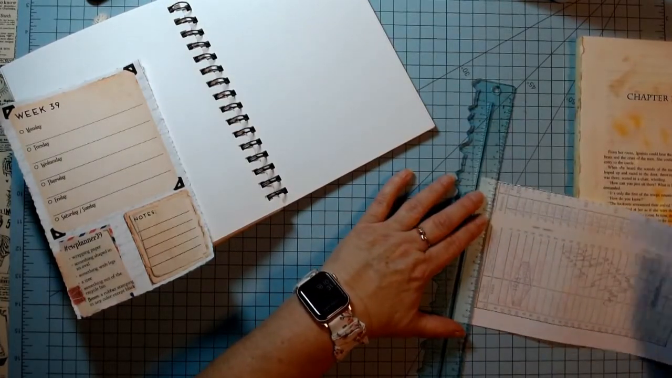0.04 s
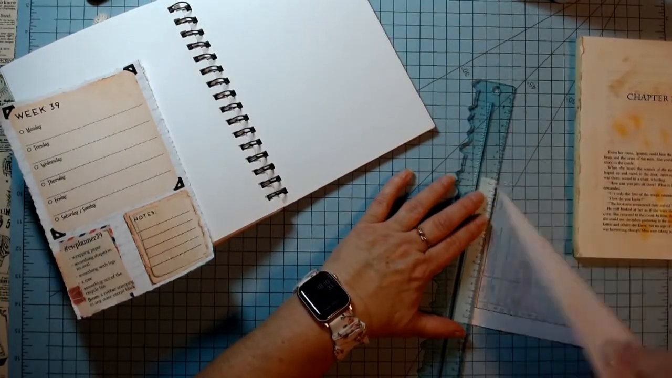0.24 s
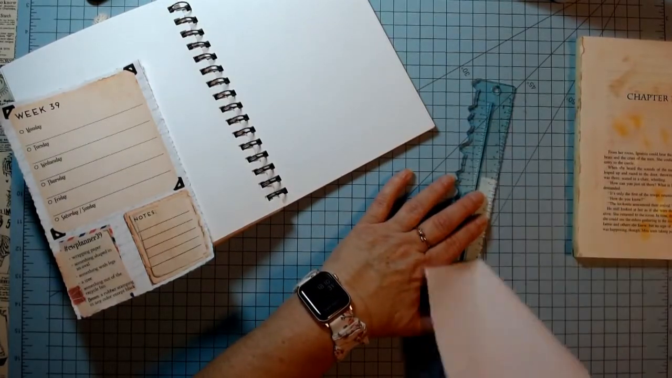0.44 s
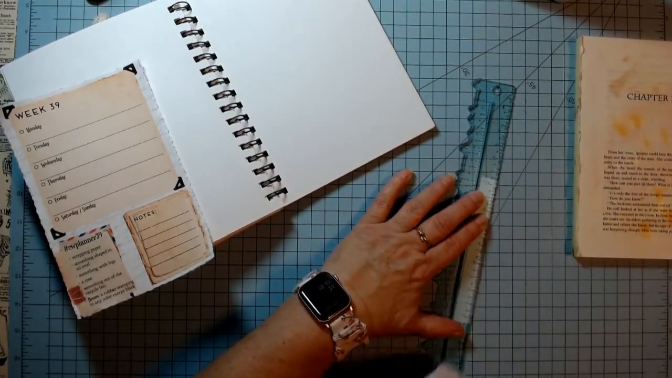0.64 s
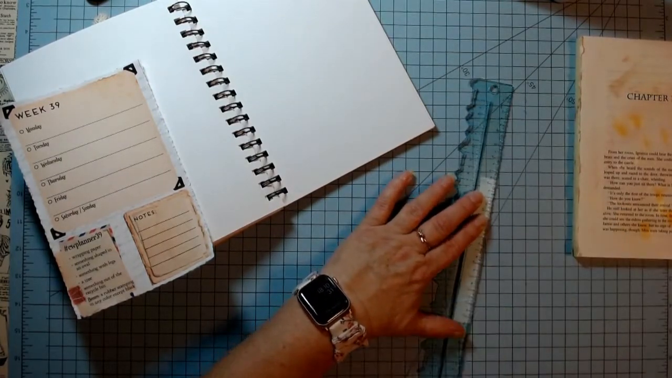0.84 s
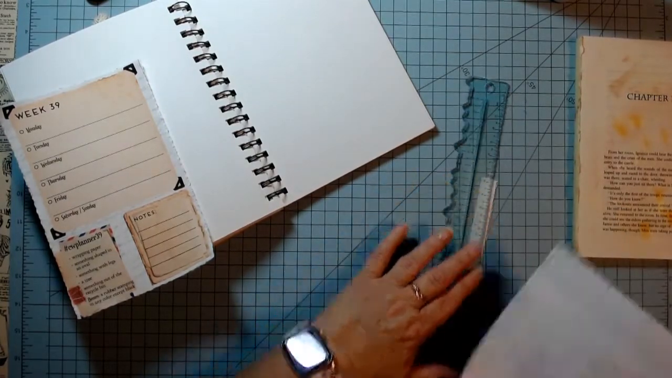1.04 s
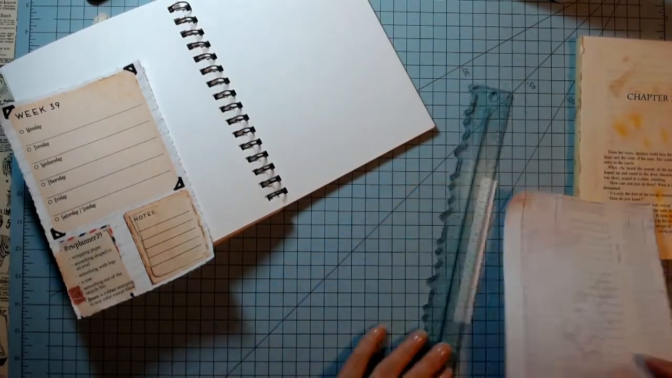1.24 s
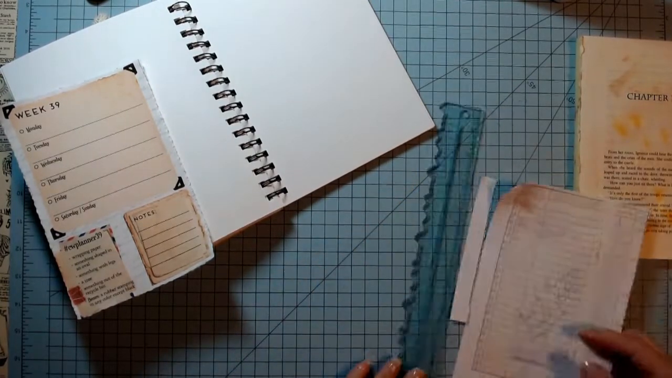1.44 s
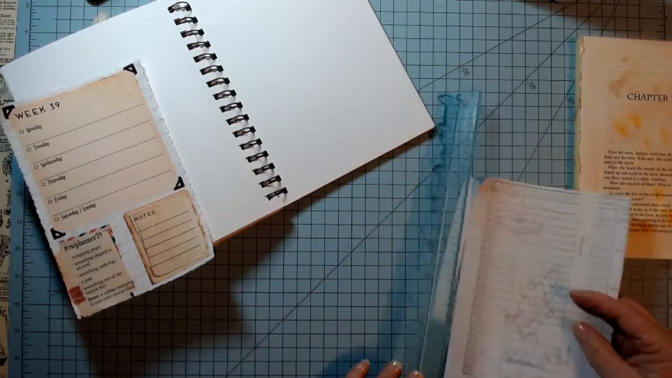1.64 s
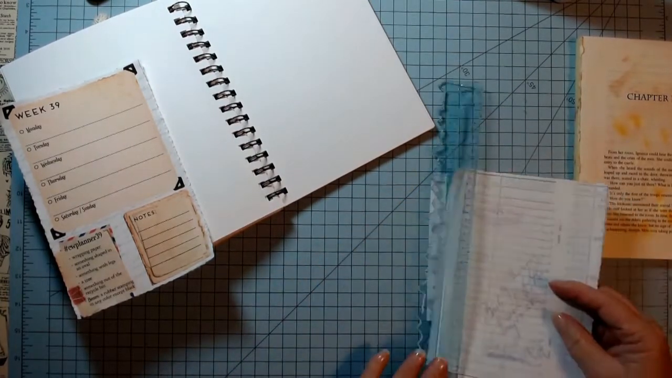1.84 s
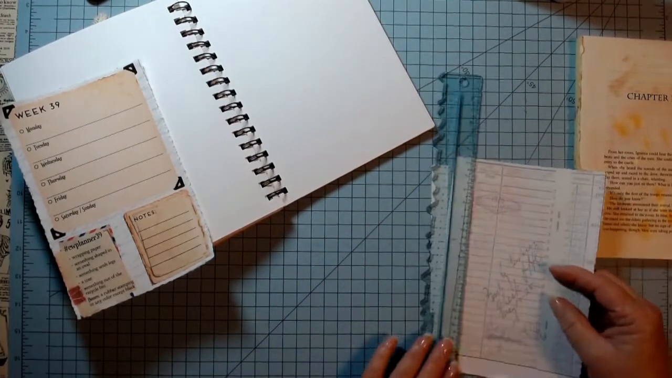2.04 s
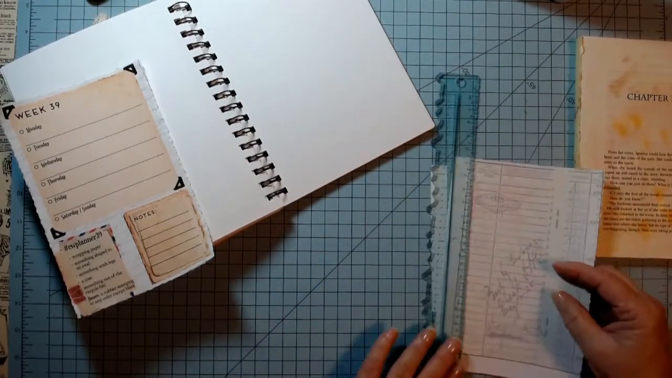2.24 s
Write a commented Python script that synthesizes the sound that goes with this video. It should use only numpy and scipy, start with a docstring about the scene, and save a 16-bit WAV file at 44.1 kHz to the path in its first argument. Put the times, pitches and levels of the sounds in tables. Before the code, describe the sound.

A sheet of paper tears crisply against a ruler edge, rustles, then the ruler clacks down

```python
"""A sheet of paper is ripped along a plastic ruler on a craft table, close under a two-port microphone.
The rip, slides and squashed paper are dense random snaps in bands that follow drawn levels.
Snapping and buckling paper and the ruler, set down with a click, ring modes; rubs are narrow noise.
A small room answers them with sparse random taps, over soft air, a low hum and a faint throbbing insect."""
import sys
import numpy as np
from scipy import signal
from scipy.fft import rfft, irfft
from scipy.io import wavfile

SR = 44100
rng = np.random.default_rng(int(sys.argv[2]) if len(sys.argv) > 2 else 0)


def amplitude_ratio(level_db):
    """Convert a level in decibels to the matching linear amplitude (field) ratio."""
    exponent = np.asarray(level_db, float) / 20
    return 10 ** exponent


def master_out(mix):
    """Clip the mix to full scale and print it as 16-bit PCM to the path in sys.argv[1]."""
    frames = np.transpose(np.atleast_2d(mix))
    ceiling = np.clip(frames, -1, 1)
    pcm = np.round(ceiling * 32767).astype(np.int16)
    wavfile.write(sys.argv[1], SR, pcm)


N = 101430  # samples

# Relative colour of tearing and squashed paper. Each row: frequency in Hz, density in dB per Hz.
RIP_COLOUR = [(30, -17.5), (60, -17.5), (90, -27), (110, -4.5), (130, -1.5), (155, -11), (220, 0),
              (270, -2), (312, 6.5), (370, -2), (550, -6), (1000, -4), (2700, -2.5), (3900, -4), (5000, -5),
              (7200, -16.5), (8200, -26.5), (15500, -38), (15900, -58.5), (16800, -91)]
# Crossovers between the four bands of scuffed paper, in Hz.
SLIDE_EDGES_HZ = [530, 1600, 3800]
SCUFFS_PER_S, SCUFF_SPREAD_DB = 7000, 6


def evened(x):
    """Scales a sound to rms 1, over all its channels together."""
    return x / np.sqrt(np.mean(x ** 2) + 1e-20)


def read(points, hz):
    """Reads a table of values over log frequency."""
    f, value = np.transpose(points)
    return np.interp(np.log(hz + 1), np.log(f + 1), value)


def resonate(x, hz, width):
    """One resonance of gain 1: shift its pitch to zero, smooth with one pole, shift back."""
    turn = np.exp(2j * np.pi * np.cumsum(hz * np.ones(N)) / SR)
    r = np.exp(-np.pi * width / SR)
    return 2 * (turn * signal.lfilter([1 - r], [1, -r], x / turn)).real


def resonate_twice(x, hz, width):
    """Two equal resonances in series, for steeper skirts."""
    return resonate(resonate(x, hz, width), hz, width)


def crackle(curves, edges_hz, colour, per_s, spread_db):
    """Dense tiny snaps of uneven size take the paper's colour; each band follows its own level."""
    sizes = amplitude_ratio(spread_db * np.minimum(rng.exponential(1, N), 4))
    snaps = rng.choice([-1., 1.], N) * sizes * (rng.random(N) < per_s / SR)
    hz, t = np.fft.rfftfreq(N, 1 / SR), np.arange(N) / SR
    lowpasses = [1 / (1 + (hz / edge) ** 8) for edge in edges_hz]
    splits = np.diff([0 * hz] + lowpasses + [0 * hz + 1], axis=0)
    coloured = rfft(snaps) * amplitude_ratio(read(colour, hz))
    bands = [evened(v) for v in irfft(coloured * splits, N)]
    out = np.zeros(N)
    for rows in curves:
        s, db, *rel_db = np.transpose(rows)
        sounding = (t >= s[0]) * (t < s[-1])
        # the third band carries the level itself, the others stand relative to it
        for band, offset in zip(bands, np.insert(rel_db, 2, 0, axis=0)):
            out += amplitude_ratio(np.interp(t, s, db + offset)) * sounding * band
    return out


def blows(rows, modes, crack_db):
    """Each blow rings the modes nearest its favoured pitch most, with a short crack of noise on top."""
    rise_s, crack_t60_s, crack_top_hz = 0.0001, 0.0027, 6000
    focus_db = 10.5  # modes weaken by this times the squared octaves from the favoured pitch
    out, t = np.zeros(N + SR), np.arange(8000) / SR
    hz, db, t60 = np.transpose(modes)[:, :, None]
    crack_lowpass = signal.butter(2, crack_top_hz, fs=SR)
    for s, peak_db, favoured_hz in rows:
        # each blow varies every mode's level, pitch and phase
        vary_db, vary_hz, vary_phase = rng.uniform(-1, 1, (3, len(modes), 1))
        focus = focus_db * np.log2(hz / favoured_hz) ** 2
        level = amplitude_ratio(db - focus + 2 * vary_db - 60 * t / t60)
        phase = 2 * np.pi * hz * (1 + 0.02 * vary_hz) * t + np.pi / 2 * vary_phase
        ring = (level * np.sin(phase)).sum(0) * np.minimum(t / rise_s, 1)
        noise = signal.lfilter(*crack_lowpass, rng.standard_normal(len(t)))
        crack = amplitude_ratio(crack_db - 60 * t / crack_t60_s) * noise
        out[round(s * SR):][:len(t)] += amplitude_ratio(peak_db) * (ring / abs(ring).max() + crack)
    return out[:N]


def room_air():
    """Steady coloured noise, partly alike in the two ports."""
    # Relative colour of the air. Each row: frequency in Hz, density in dB per Hz.
    air_colour = [(8.8, -19.5), (15, -1), (97, -5), (417, -18), (793, -26.5), (1420, -30), (2080, -30.5),
                  (3610, -39), (7720, -46), (8930, -64.5), (16000, -67.5)]
    # Left-right likeness. Each row: frequency in Hz, likeness from 0 to 1.
    air_same = [(30, 0.71), (500, 0.83), (2000, 0.64), (8000, .2)]
    air_db = -69.5
    hz = np.fft.rfftfreq(N, 1 / SR)
    a, b = rfft(rng.standard_normal((2, N)))
    same = np.clip(read(air_same, hz), 0, 1)
    pair = np.array([a, same * a + np.sqrt(1 - same ** 2) * b])
    return amplitude_ratio(air_db) * evened(irfft(pair * amplitude_ratio(read(air_colour, hz)), N))


def low_hum():
    """A steady sine plus narrow noise at the same pitch, which wavers more on the left."""
    hum_hz, width_hz, steady, hum_db = 41.5, 12, 0.7, -59
    left_waver = 1.6  # times the right
    tone = np.sqrt(2) * np.sin(2 * np.pi * hum_hz * np.arange(N) / SR)
    waver = evened(resonate_twice(rng.standard_normal(N), hum_hz, width_hz))
    waver = waver * np.array([[left_waver], [1]])
    return amplitude_ratio(hum_db) * evened(steady * tone + (1 - steady) * waver)


def insect():
    """Narrow high noise, separate in each port, swells and fades in regular throbs."""
    pitch_hz, width_hz, throbs_per_s, first_peak_s, insect_db = 7750, 700, 29.5, 0.01, -89.5
    t = np.arange(N) / SR
    throb = np.cos(np.pi * throbs_per_s * (t - first_peak_s)) ** 4
    chirp = [resonate_twice(v, pitch_hz, width_hz) for v in rng.standard_normal((2, N))]
    return amplitude_ratio(insect_db) * evened(throb * np.array(chirp))


def room(x):
    """Three tails of sparse random taps take turns; each band has its own level and decay."""
    # Decay of the room. Each row: frequency in Hz, t60 in seconds.
    room_t60 = [(150, 0.32), (600, 0.055), (2000, 0.16), (6000, 0.12), (12000, 0.022)]
    # Colour of the tail. Each row: frequency in Hz, level in dB.
    tail_db = [(80, -14.5), (300, -7), (1000, -2), (4000, -2), (12000, 15)]
    turn_s = 0.04  # for each turn between tails, so no fixed pattern of echoes stands out
    taps = np.zeros((3, 2, SR // 2))
    slots = np.arange(40, SR // 2 - 20, 20)  # one tap somewhere in each 20 samples
    at = slots + rng.integers(0, 20, (3, 2, len(slots)))
    np.put_along_axis(taps, at, rng.choice([-1., 1.], at.shape), 2)
    hz, t, z = signal.stft(taps, SR, nperseg=256)
    fade = amplitude_ratio(-60 * t / read(room_t60, hz)[:, None])
    fade = fade / np.linalg.norm(fade, axis=1)[:, None] * amplitude_ratio(read(tail_db, hz))[:, None]
    tail = signal.istft(z * fade, SR, nperseg=256)[1] * np.sqrt(20 / 128)
    # three cosines a third of a half-turn apart keep the summed power constant
    angle = np.arange(N) / SR / turn_s / 3 + np.arange(3)[:, None] / 3
    turns = np.sqrt(2 / 3) * np.cos(np.pi * angle)
    return signal.fftconvolve((turns * x)[:, None], tail, axes=2)[..., :N].sum(0)


def ports(x):
    """The direct sound reaches the right port first, with a colour of its own."""
    # Right port against the left. Each row: frequency in Hz, level in dB.
    right_db = [(60, -4.5), (300, -2.5), (1200, -3), (3000, 0.34), (6000, 0.5), (12000, -2.9)]
    left_lag = 4  # samples
    left = np.pad(x, (left_lag, 0))[:N]
    right = irfft(rfft(x) * amplitude_ratio(read(right_db, np.fft.rfftfreq(N, 1 / SR))), N)
    return np.array([left, right])


def paper_slides():
    """Paper lifted and slid: scuffs of very uneven size in four bands."""
    # One list per stretch of sliding, a new one at sharp onsets. Each row: time in seconds,
    # level in dB near 2.5 kHz, then bass, middle and treble in dB re that level.
    slide_curves = [
        [(0.0, -91, 23, 3, 16), (0.032, -67, -5, -6, -7.5), (0.108, -94.5, 11, 6, 7),
         (0.122, -72, 17, 18, -9.5)],
        [(0.7, -76, 12, 16, -5), (0.704, -83, 0, 29, -9), (0.716, -57, -8, 28, -17)],
        [(1.788, -83.5, 9, 10.5, 10.5), (1.81, -65.5, -19.5, -7, -3.5), (1.846, -73.5, -10, 1.5, -0.5),
         (1.898, -87.5, -7, 4, 9)],
        [(1.907, -73.5, -10.5, -9.5, 18), (1.911, -71.5, -11, -18, 7.5), (1.939, -73, -7.5, -19, -1),
         (1.985, -93, 23, 4, 8)],
        [(2.236, -95.5, 3.5, -1.5, 5), (2.244, -79.5, -11, 3.5, 6), (2.288, -77.5, -2, -11, -8),
         (2.3, -84.5, 11, -1, 1)],
        [(0.125, -62, 16, 21.5, -7), (0.137, -39.5, 4.5, -4, 0), (0.163, -47.5, 2.5, -8, -15),
         (0.191, -63.5, 19.5, 10.5, -13), (0.203, -63, 15.5, 21, -5)],
        [(1.11, -74, -22, -11, 0), (1.132, -61.5, -10, -2, 2.5), (1.152, -58.5, -3.5, 2, -2.5),
         (1.214, -58, -1.5, -7, -7), (1.232, -61, -6, -15, -6), (1.26, -69, 4, 3, -13), (1.27, -64.5, 5, 5, 7)],
        [(1.272, -70, -17, 12, 0), (1.282, -51.5, -8, 0, -10.5), (1.384, -75.5, 14, 5.5, -3),
         (1.426, -78, 0, -0.5, -6.5), (1.462, -93, 24, 4.5, -12), (1.48, -81, -7, 10, 0),
         (1.49, -95.5, 16, 4, -13)],
        [(1.49, -93.5, 19.5, 21, 3), (1.56, -60.5, -10.5, -8, -7.5), (1.606, -60.5, -18, -22, -6),
         (1.624, -67.5, -9, -9.5, -5.5), (1.652, -72, -8.5, -4, -8), (1.702, -93.5, 22, 16, -4),
         (1.786, -97, 19, 13, -0.5)],
        [(0.717, -53.5, -12, 15, -15), (0.729, -46, -22, 9.5, -11), (0.739, -57.5, -6, 14, -3),
         (0.783, -62, 4, 16, 7.5), (0.819, -54.5, -10, 13.5, -3.5), (0.855, -67.5, 8, 1, -1),
         (0.875, -58, 9, 11.5, -0.5), (0.925, -65, 2, 2, 1.5), (0.947, -57, -14, -3, -3.5),
         (1.013, -57.5, -15, 0.5, 1), (1.023, -53.5, -14, 0.5, 1.5), (1.045, -72.5, -2, 7, 6),
         (1.11, -69, -10, -3, 6)],
    ]
    # Relative colour of sliding paper. Each row: frequency in Hz, density in dB per Hz.
    slide_colour = [(60, -23.5), (120, -1.5), (270, 3.5), (450, 2), (700, 6.5), (1000, 6.5), (2600, 5),
                    (5000, -2.5), (7200, -18), (8200, -26.5), (15500, -37), (15900, -51.5), (16800, -89.5)]
    return crackle(slide_curves, SLIDE_EDGES_HZ, slide_colour, SCUFFS_PER_S, SCUFF_SPREAD_DB)


def paper_rubs():
    """Rubbed paper briefly sings, or thumps low: noise in one narrow resonance, swelling and fading."""
    # Each row: start in seconds, length in seconds, starting pitch in Hz,
    # width of each resonance in Hz, level in dB at the height of the swell.
    rub_rows = [(0.765, 0.078, 820, 250, -46), (1.015, 0.017, 2630, 400, -52.5),
                (1.124, 0.083, 1017, 110, -53.5), (1.208, 0.15, 908, 64, -61.5),
                (1.274, 0.03, 1770, 650, -44), (1.379, 0.11, 2456, 18, -79), (1.589, 0.036, 2140, 60, -60),
                (1.545, 0.076, 2680, 110, -64), (1.55, 0.1, 1286, 370, -65),
                (1.683, 0.064, 700, 200.3, -70), (1.902, 0.038, 2700, 470, -64),
                (0.863, 0.031, 715, 400, -50.5), (1.439, 0.071, 2160, 44, -77.5),
                (0.904, 0.067, 130, 45, -62), (1.13, .06, 120, 60, -64), (1.169, 0.091, 216, 34, -61.5)]
    rise = 0.59  # below 1: rises faster than it fades
    sag = 0.01  # share by which the pitch falls over one rub
    noise, t, out = rng.standard_normal(N), np.arange(N) / SR, np.zeros(N)
    for s, length, start_hz, width, db in rub_rows:
        done = np.clip((t - s) / length, 0, 1)
        swell = np.sin(np.pi * done ** rise)
        out += amplitude_ratio(db) * swell * evened(resonate_twice(noise, start_hz * (1 - sag * done), width))
    return out


def sheet_snaps_and_pops():
    """The sheet snaps as it rips and pops as it buckles: each blow rings its modes, the bass cut away."""
    # Each row: time in seconds, peak of the ring in dB before the bass cut, favoured pitch in Hz.
    sheet_blows = [(0.13, -31.5, 480), (0.135, -23, 1540), (0.148, -26.5, 1000), (0.176, -33, 500),
                   (0.211, -21.5, 2700), (0.216, -20, 700), (0.2365, -14, 2800), (0.246, -18, 2000),
                   (0.2585, -14.5, 1810), (0.267, -16.5, 1900), (0.309, -17, 2900), (0.329, -15, 2400),
                   (0.436, -21, 1200), (0.478, -18, 1000), (0.558, -18, 1000), (0.708, -36.5, 800),
                   (0.7165, -18.5, 800), (0.717, -33.5, 2850), (0.721, -28, 1150), (0.725, -26, 700),
                   (0.728, -23, 1350), (0.733, -32, 2700), (0.748, -26.5, 650), (0.754, -25, 820),
                   (0.778, -34, 800), (0.787, -30, 1110), (0.8, -36, 1100), (0.816, -34.5, 830),
                   (0.835, -39.5, 800), (0.869, -32.5, 700), (0.884, -39, 600), (1.021, -52, 2700),
                   (1.279, -48, 1800)]
    # Modes of the sheet. Each row: pitch in Hz, level in dB, t60 in seconds.
    sheet_modes = [(478, -7, .05), (615, -3, 0.03), (700, 3, 0.02), (830, -2.5, 0.079), (910, -6.5, 0.02),
                   (1150, -1.5, 0.03), (1400, -6.5, 0.0074), (1980, -4.5, 0.017), (2228, -5.5, 0.023),
                   (2850, -5.5, .012)]
    crack_db, lowest_hz = -23, 380  # crack re the ring's peak
    bass_cut = signal.butter(2, lowest_hz, "high", fs=SR, output="sos")
    return signal.sosfilt(bass_cut, blows(sheet_blows, sheet_modes, crack_db))


def paper_squash():
    """Paper pressed flat under the ruler: scuffs in the colour of the rip."""
    # Each row: time in seconds, level in dB near 2.5 kHz before the trim,
    # then bass, middle and treble in dB re that level.
    squash_curve = [(1.99, -64.5, 13, 0, -3), (1.998, -35.5, -2, 6.5, 3.5), (2.008, -28.5, 2, 8.5, -9.5),
                    (2.038, -53.5, 23.5, -13, 5), (2.046, -37, -7, 6, 0), (2.06, -48, -3, 13.5, 4.5),
                    (2.194, -100, 39.5, -2.5, 3), (2.2, -94, 16, 2, -7.5)]
    trim_db = -8
    scuffs = crackle([squash_curve], SLIDE_EDGES_HZ, RIP_COLOUR, SCUFFS_PER_S, SCUFF_SPREAD_DB)
    return amplitude_ratio(trim_db) * scuffs


def ruler_knocks():
    """The ruler lands and rocks: each knock rings the modes of the ruler."""
    # Each row: time in seconds, peak of the ring in dB, favoured pitch in Hz.
    knock_rows = [(1.9995, -17.5, 3000), (2.004, -20.5, 450), (2.0075, -16.5, 2760), (2.015, -26, 1903),
                  (2.021, -26.5, 750), (2.029, -26.5, 220.5), (2.045, -22, 2000), (2.053, -23.5, 1400),
                  (2.064, -36, 298)]
    # Modes of the ruler. Each row: pitch in Hz, level in dB, t60 in seconds.
    ruler_modes = [(122.6, -6, 0.22), (210, 1, 0.12), (333.4, 3, 0.038), (730, 1.5, 0.0264),
                   (1400, -1, 0.024), (2017, 5, 0.014), (2713, 5.5, 0.015), (3000, -2.5, .015),
                   (3480, -7, 0.018)]
    return blows(knock_rows, ruler_modes, -27.5)  # crack in dB re the ring's peak


def rip():
    """Paper fibres snap thousands of times a second, nearly equal in size, in five bands."""
    # Each row: time in seconds, level in dB near 1 kHz, then table drone, sheet drone,
    # upper middle and treble in dB re that level.
    rip_curve = [(0.2108, -29.5, -4, 1, 6, 0), (0.237, -24, -20.5, -1.5, 4, -4.5),
                 (0.261, -22, -18.5, -5.5, 0, -9), (0.285, -29.5, -6.5, -8, 1, 0),
                 (0.307, -31.5, -5, -4.5, 6, 4.5), (0.331, -23.5, -18.5, -8.5, 0.5, -5.5),
                 (0.339, -28, -6, -0.5, 8, -2.5), (0.365, -29.5, -4.5, -8.5, 2, -5.5),
                 (0.417, -28.5, 1, -15.5, -5.5, -2), (0.439, -25.5, -13.5, -7.5, -1, -6),
                 (0.465, -27, -12.5, -8, -4, -5.5), (0.479, -26.5, -22.5, -16.5, -5, -10),
                 (0.511, -30, -3, -16, -5.5, -5), (0.555, -28, -14.5, -13, -3, -8),
                 (0.557, -23.5, -6, -13, -13.5, -13.5), (0.593, -41.5, -4, -22.5, -6, -13),
                 (0.621, -36.5, -11, -25.5, -13.5, -22.5), (0.659, -62.5, -27, -20, -23, -16),
                 (0.7, -54, -28.5, -16, -37, -16)]
    # Crossovers between the five bands, in Hz.
    rip_edges_hz = [190, 530, 1600, 3800]
    fibres_per_s, fibre_spread_db = 5000, 2
    return crackle([rip_curve], rip_edges_hz, RIP_COLOUR, fibres_per_s, fibre_spread_db)


def scene():
    """Paper and ruler sound on the table, the room adds its tail, and the background lies under all."""
    paper = paper_slides() + paper_rubs() + sheet_snaps_and_pops() + paper_squash() + rip()
    table = paper + ruler_knocks()
    background = room_air() + low_hum() + insect()
    return ports(table) + room(table) + background


def top_cut(x):
    """Nothing passes above the cut-off."""
    return signal.sosfilt(signal.butter(12, 16440, fs=SR, output="sos"), x)


def record(dry):
    """A steep lowpass ends the treble of the finished mix."""
    edge_hz = 16350
    lowpass = signal.firwin(255, edge_hz, window=("kaiser", 8), fs=SR)
    limited = signal.oaconvolve(dry, lowpass[None], "same")
    return top_cut(limited)


dry = scene()
out = record(dry)
master_out(out)
```